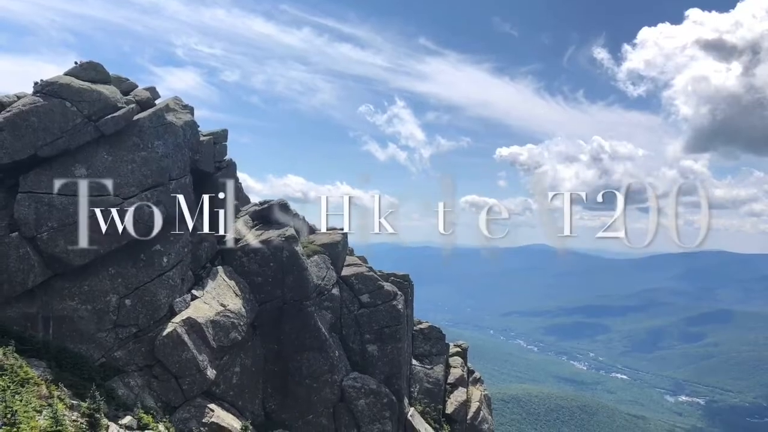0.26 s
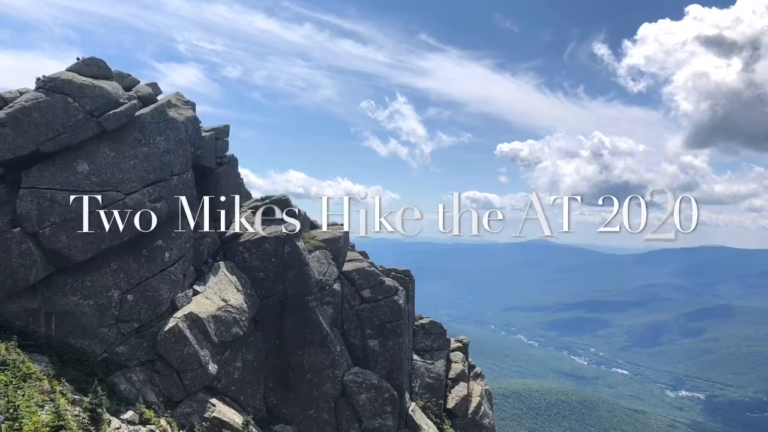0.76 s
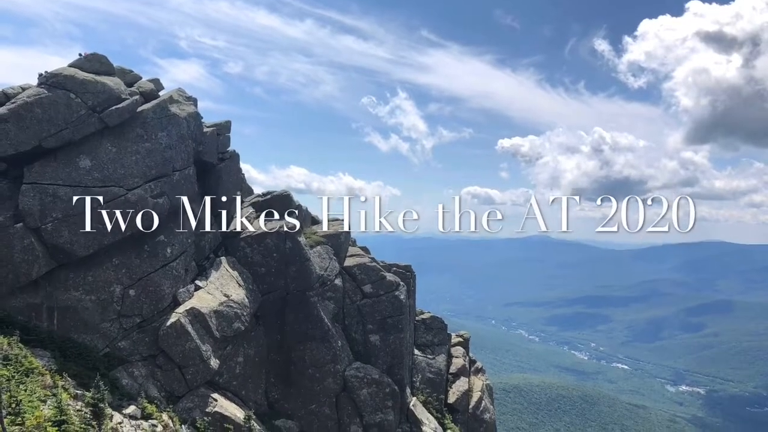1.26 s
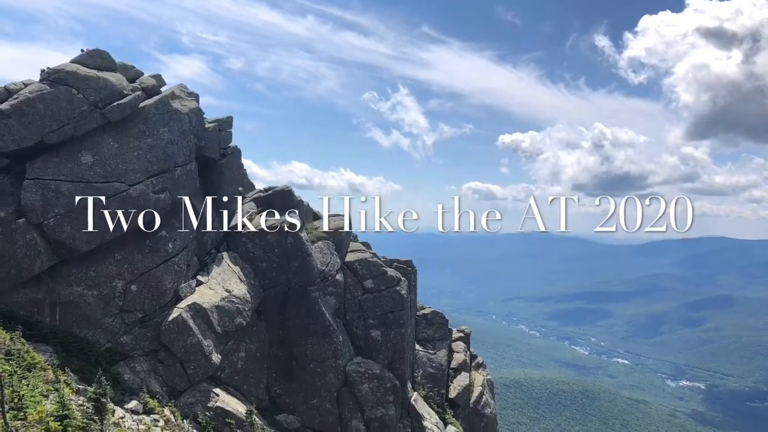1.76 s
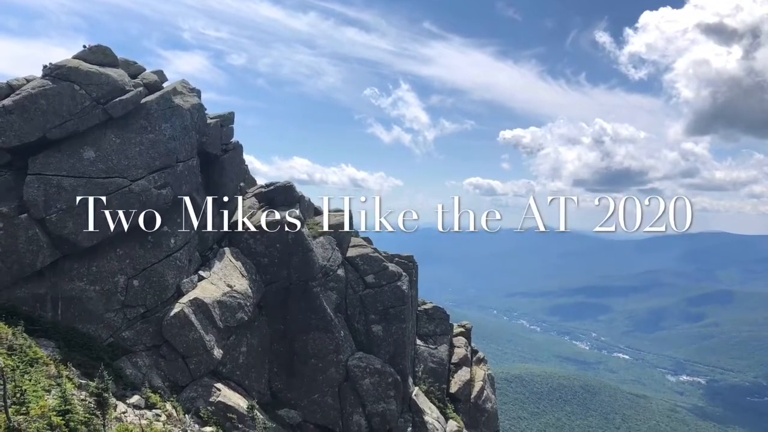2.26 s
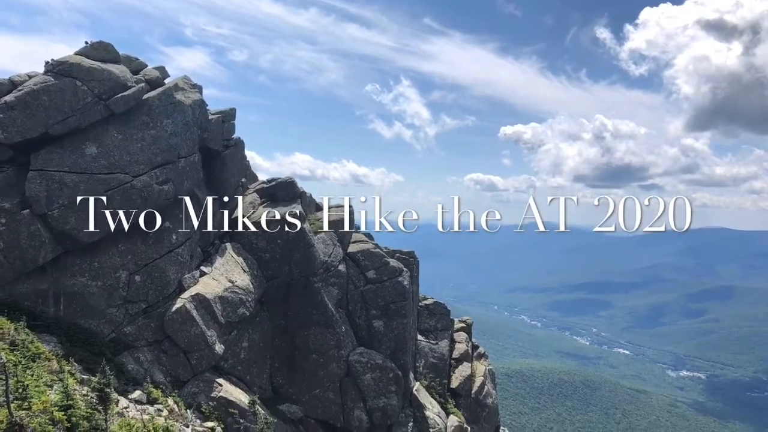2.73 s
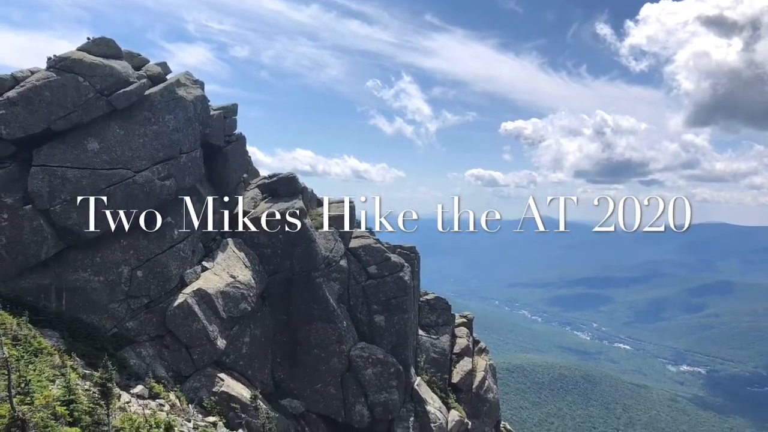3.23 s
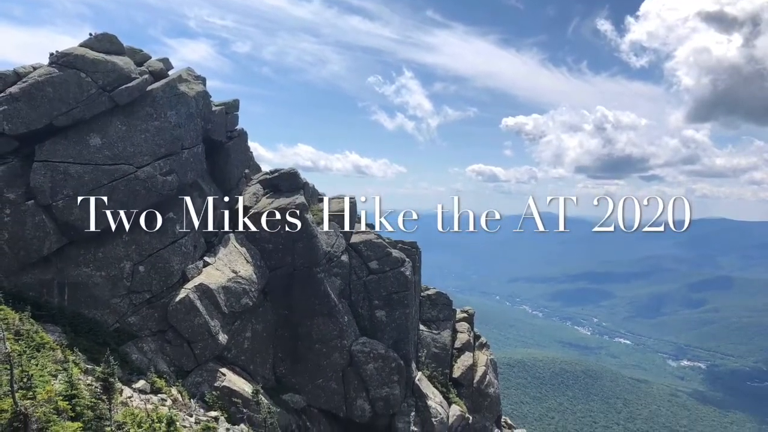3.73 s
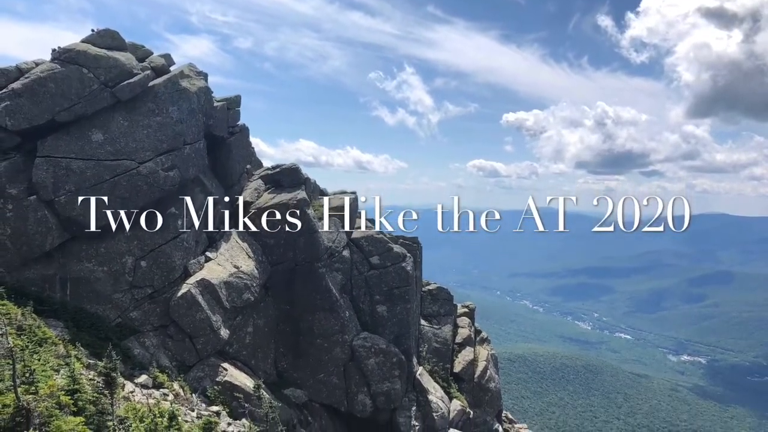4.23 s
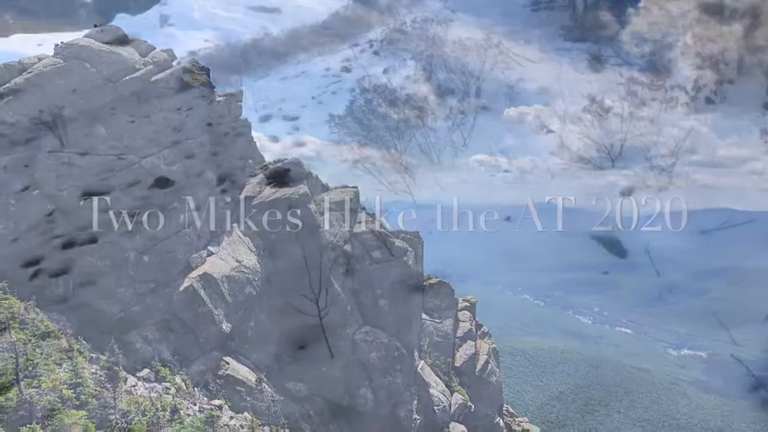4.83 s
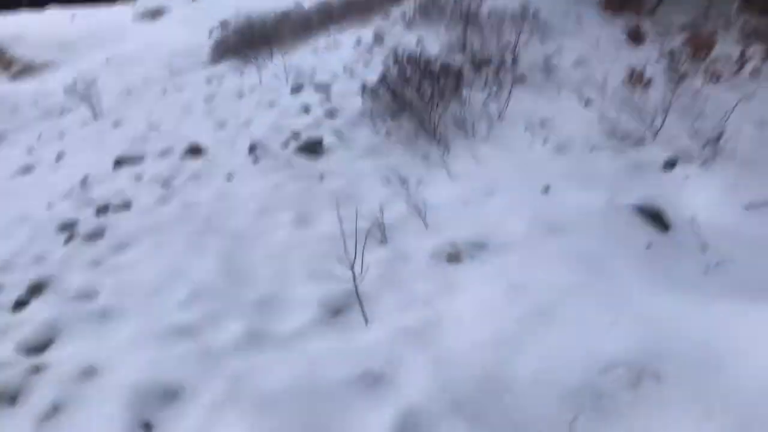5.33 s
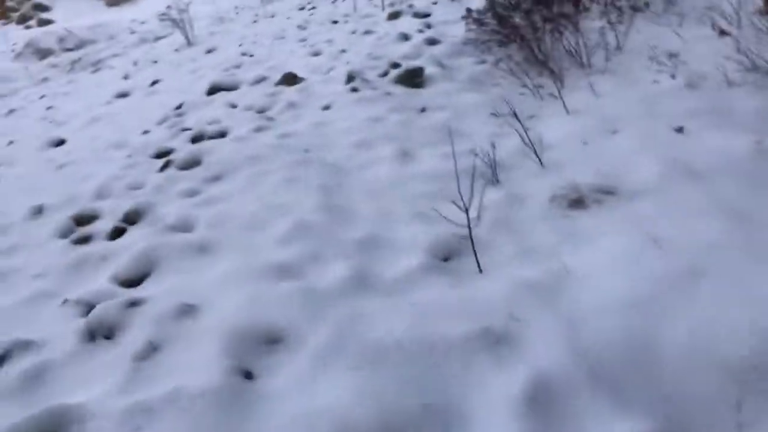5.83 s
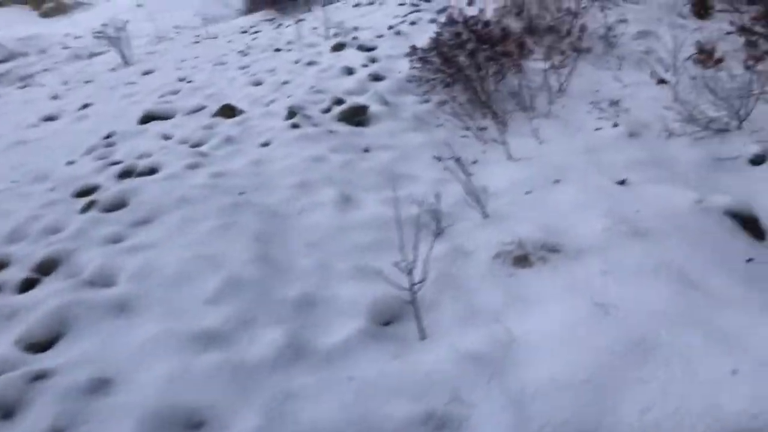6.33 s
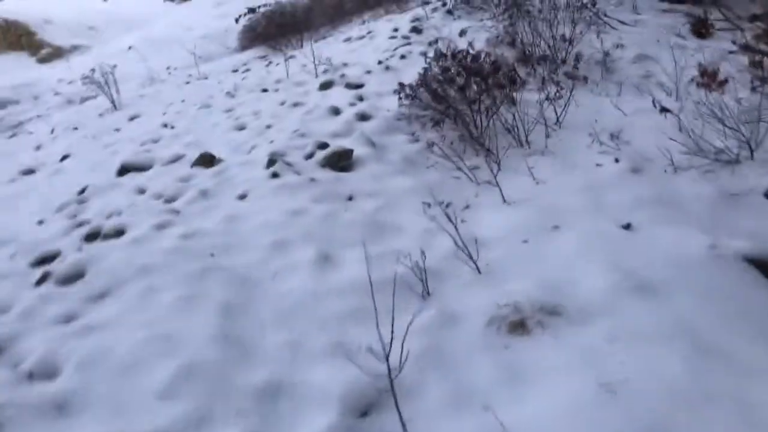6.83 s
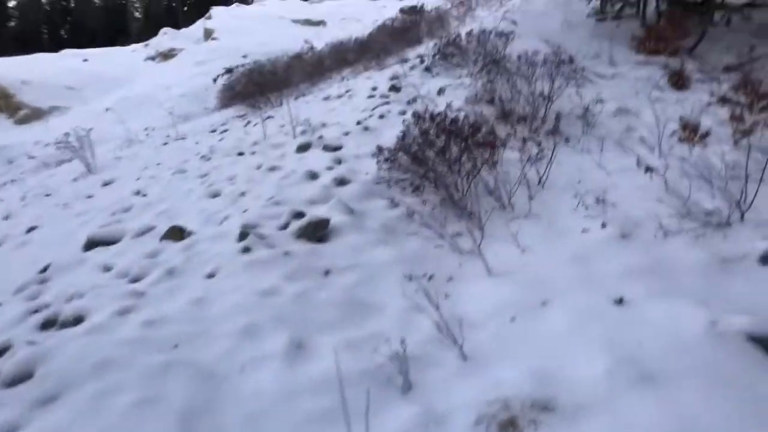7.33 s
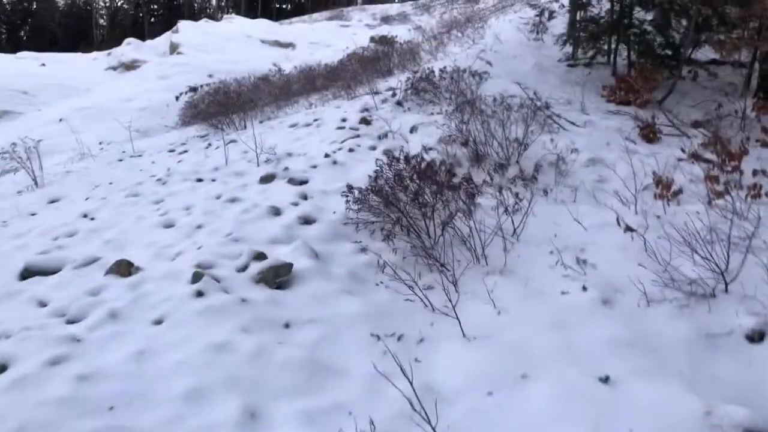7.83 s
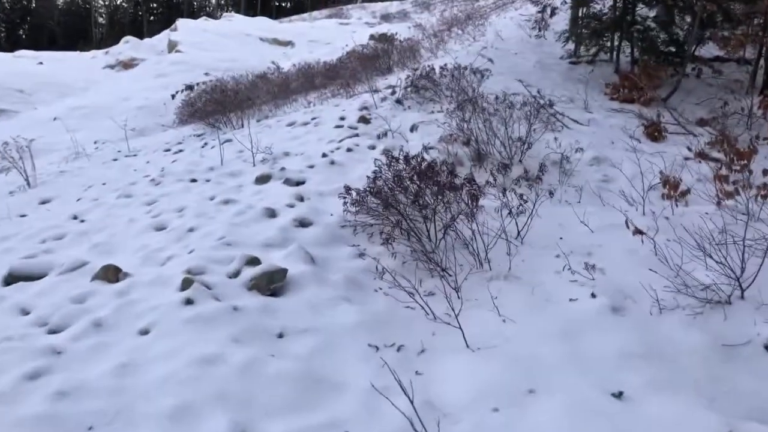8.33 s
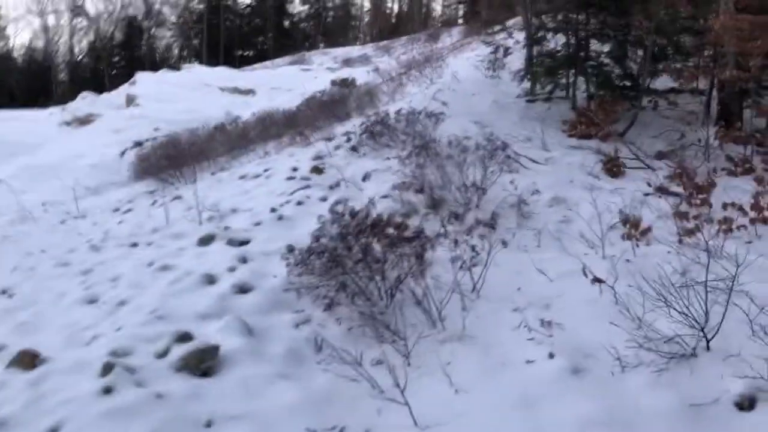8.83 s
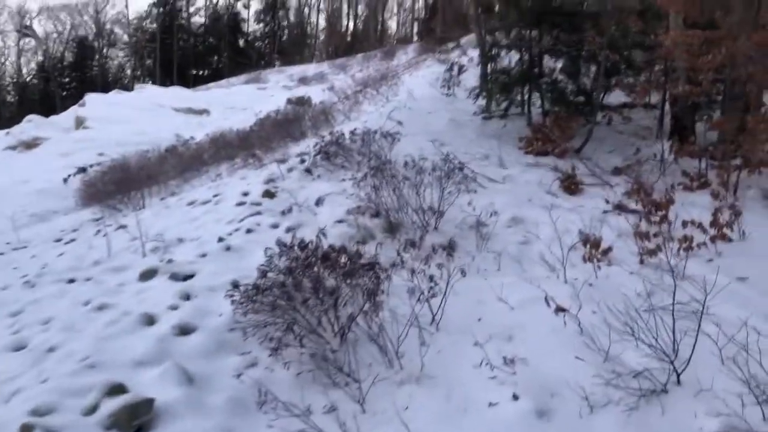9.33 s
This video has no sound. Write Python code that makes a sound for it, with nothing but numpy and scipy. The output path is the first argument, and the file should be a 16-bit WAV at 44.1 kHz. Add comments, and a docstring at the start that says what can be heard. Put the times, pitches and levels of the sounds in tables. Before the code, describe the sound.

Quick footsteps crunch on grit and ice outdoors, a little off to one side, with stones clicking and knocking under the soles. After about eight steps, the sound changes to a slower walk in crusted snow, close and centred. Each boot cracks the hard surface and presses down the snow beneath with a soft thump, and the last step brings a brief hollow note. Faint outdoor air lies behind both walks.

```python
"""Two walks, one after the other. First, quick boots crunch on gritty, icy ground, off to one side of a
pair of microphone openings. Each crush is a swarm of breaking grains, and the packed ground answers with
a later, sinking thud. From about 4 s the air of the first place fades into that of the second, where
slower boots break through crusted snow, close to a single microphone. At the very end, a hollow under
the crust rings."""
import sys
import numpy as np
from scipy import signal
from scipy.fft import rfft, irfft, next_fast_len
from scipy.io import wavfile

SR = 44100
rng = np.random.default_rng(int(sys.argv[2]) if len(sys.argv) > 2 else 0)


def log_audio(samples):
    """Write samples as a 16-bit WAV file to the path given in sys.argv[1]."""
    # one column per channel
    frames = np.atleast_2d(samples).T
    # limit to full scale, then quantise
    limited = np.clip(frames, -1, 1)
    pcm = np.round(limited * 32767).astype(np.int16)
    wavfile.write(sys.argv[1], SR, pcm)


N = 422478

# the bright tone of snapping ice and loose grains: pitch_hz, level_db
ICE_TONE = [(500, -42), (1500, -7), (3000, 4), (5000, -9.5), (9000, -12.5), (16000, -13.5)]


def boots_on_grit():
    """The heel lands, the sole rolls and the grit settles; the sole also grinds, and stones crack."""
    # footfalls: start_s, heel_db, heel_length_s, roll_db, roll_length_s, thud_over_crunch_db
    steps = [(0.134, -32.5, .015, -38.5, 0.17, -10), (0.797, -31.5, 0.0043, -33, 0.091, -7.5),
             (1.37, -41, 0.0078, -38.5, 0.12, -3), (2.014, -33, 0.012, -29.5, 0.038, -4),
             (2.616, -31, 0.0034, -37.5, 0.16, -6.5), (3.244, -34, .008, -40.5, 0.18, -8.5),
             (3.844, -28.5, 0.013, -41, 0.15, -8.5), (4.414, -30, 0.0076, -37.5, 0.089, -5.5)]
    # the sole grinds or scuffs the grit: start_s, length_s, crunch_db, hiss_over_crunch_db
    grinds = [(0.289, 0.053, -44, -7.5), (0.435, 0.19, -55.5, -8), (0.82, 0.067, -33.5, -11.5),
              (1.213, 0.23, -61, -30), (1.502, 0.055, -36.5, -45), (1.784, 0.21, -60, -18),
              (2.011, 0.064, -42, -9.5), (2.362, 0.26, -54, -24), (2.648, 0.057, -29.5, -40),
              (2.71, 0.033, -36.5, -40), (2.76, 0.076, -43, -8), (3.09, 0.27, -62, -30),
              (3.276, 0.051, -31.5, -18), (3.541, 0.062, -49, -11), (4.457, 0.014, -32, -29),
              (4.554, 0.056, -41.5, -20.5)]
    # single stones crack: start_s, crunch_db, hiss_over_crunch_db
    stones = [(0.146, -25, -45), (0.269, -25, -17), (0.479, -40, -4), (0.525, -43, -40),
              (0.824, -25.5, -45), (0.894, -41, -27), (1.102, -35, -40), (1.247, -42.5, -40),
              (1.409, -25, -15), (1.98, -52, -35), (2.031, -20, -7.5), (2.214, -40, -40), (2.375, -31, -42),
              (2.452, -32, -38), (2.541, -41, -42), (2.649, -27, -41), (2.666, -19.5, -40),
              (2.674, -20, -28), (2.707, -20, -36), (2.718, -27, -32), (2.804, -42, -30),
              (3.103, -45.5, -30), (3.155, -43, -40), (3.336, -29, -27), (3.38, -31.5, -44),
              (3.46, -39.5, -24), (3.759, -45.5, -26), (3.935, -36.5, -8), (4.218, -45.5, -40),
              (4.362, -43.5, -35), (4.394, -40.5, -35)]
    # the tone of the grit's crunch, hiss and thud: pitch_hz, level_db
    crunch_tone = [(150, -36.5), (300, -5.5), (600, -2.5), (800, -4), (1150, -12), (1700, -12.5),
                   (3500, -30), (9000, -42)]
    hiss_tone = [(1800, -62), (3500, 4.5), (8000, 12), (16000, -8)]
    thud_tone = [(40, -6), (90, -11), (200, 5.5), (300, 2), (500, -34)]
    stone_s, settle_s = 0.00491, 0.26
    stone_thud_db, grind_thud_db, step_hiss_db = -30.5, -18.5, -40  # compared with the crunch
    crushes = [(at, stone_s, db, hiss_db, stone_thud_db) for at, db, hiss_db in stones]
    crushes += [(*grind, grind_thud_db) for grind in grinds]
    for at, heel_db, heel_s, roll_db, roll_s, thud_db in steps:
        heel = (at, heel_s, heel_db)
        roll = (at, roll_s, roll_db)
        settle = (at + roll_s, settle_s, roll_db - 20)
        crushes += [(*part, step_hiss_db, thud_db) for part in (heel, roll, settle)]
    return crush_ground(crushes, (crunch_tone, hiss_tone, thud_tone), rise_s=0.001, thud_extra_s=0.011,
                        sink_cycles=0.472, grains_per_s=500, spread_db=2.5, click_share=0.61)


def boots_in_snow():
    """The boots crack the hard crust and press down the snow below it."""
    # the snow is pressed down: start_s, length_s, crunch_db, hiss_over_crunch_db
    presses = [(4.841, 0.13, -50.5, -5.5), (4.933, 0.084, -45, -9), (5.058, 0.066, -41.5, -16),
               (5.141, 0.048, -43.5, -15), (5.38, 0.12, -41.5, -23), (5.576, 0.11, -48.5, -39),
               (5.639, 0.11, -30.5, -14), (5.813, 0.093, -43, -4), (5.877, 0.063, -44.5, -1.5),
               (6.137, 1, -53, -12.5), (6.441, 0.03, -36, -2.5), (6.496, 0.18, -31.5, -7.5),
               (6.749, 0.14, -44, -6.5), (6.915, 0.21, -57.5, -3), (6.995, 0.054, -43.5, -21),
               (7.238, 0.21, -61.5, -13), (7.377, 0.047, -30.5, -7), (7.384, 0.21, -39.5, -12),
               (7.554, 0.052, -29, -11), (7.625, 0.14, -49, -8.5), (7.979, 0.032, -53.5, -13),
               (8.324, 0.037, -35, -7.5), (8.4, 0.091, -34.5, -7), (8.496, 0.081, -37.5, -31),
               (8.568, 0.19, -37.5, -11), (8.798, 0.11, -49.5, -18), (9.172, 0.17, -59.5, -4.5),
               (9.337, 0.18, -29.5, -12.5), (9.485, 0.023, -34, -4)]
    # the crust cracks: start_s, length_s, crunch_db, thud_over_crunch_db
    cracks = [(4.79, 0.0028, -35.5, -1), (4.825, 0.0078, -37.5, -0.5), (5.187, 0.0055, -42, -1),
              (5.383, 0.021, -25, -4.5), (5.454, 0.0035, -31.5, -12), (5.497, 0.0069, -25.5, -13.5),
              (5.656, 0.023, -21.5, 2.5), (5.67, 0.013, -23, -14), (5.771, 0.0037, -29, -1),
              (5.781, 0.0078, -28, 0), (5.831, 0.011, -35, -12), (6.093, 0.0081, -40, -5),
              (6.147, 0.01, -32.5, -2.5), (6.185, 0.0074, -39.5, -6), (6.226, 0.017, -32.5, -3.5),
              (6.294, 0.014, -32, -5), (6.34, .006, -41, -2), (6.356, 0.017, -33, -1),
              (6.392, .014, -31.5, -3.5), (6.448, 0.0087, -31.5, -5), (6.586, 0.018, -16.5, -11.5),
              (6.653, 0.011, -28, -5), (6.694, 0.0047, -33, 1), (6.724, 0.0052, -34.5, -0.5),
              (6.763, 0.015, -40, 4.5), (7.102, 0.0059, -45.5, -20), (7.262, 0.012, -34.5, -1.5),
              (7.335, 0.018, -40, 1), (7.398, 0.027, -23.5, -4), (7.415, 0.0035, -21.5, 0.5),
              (7.509, 0.0033, -28, 0), (7.56, 0.011, -21, -0.5), (7.74, 0.0047, -42.5, 3),
              (7.786, 0.0075, -38, -0.5), (8.161, 0.015, -51, -5), (8.222, 0.012, -43.5, -1),
              (8.256, 0.01, -35, -2), (8.305, 0.0099, -46, -1), (8.385, 0.0052, -26, -4),
              (8.642, 0.013, -24, -10), (8.664, 0.011, -19, 1), (8.803, 0.0058, -33, -23),
              (9.237, 0.0086, -41, 0.5), (9.297, 0.0064, -35, -3), (9.335, 0.0029, -38, -3),
              (9.44, 0.022, -21, -23), (9.509, 0.0036, -22.5, -7)]
    # the tone of the snow's crunch, hiss and thud: pitch_hz, level_db
    crunch_tone = [(250, -20.5), (450, -2.5), (1000, -4), (1400, -5), (2300, -5.5), (2800, -10),
                   (4500, -16.5), (10000, -53)]
    hiss_tone = [(3000, -5), (5000, -2), (8000, -2.5), (16000, -20)]
    thud_tone = [(25, -26), (60, -4.5), (160, 1.5), (330, 1), (450, -3), (700, -28)]
    press_thud_db, crack_hiss_db = -2, -11.5  # compared with the crunch
    crushes = [(*press, press_thud_db) for press in presses]
    crushes += [(at, length_s, db, crack_hiss_db, thud_db) for at, length_s, db, thud_db in cracks]
    return crush_ground(crushes, (crunch_tone, hiss_tone, thud_tone), rise_s=0.0024, thud_extra_s=0.0053,
                        sink_cycles=1.381, grains_per_s=1500, spread_db=4.0, click_share=0.054)


def crush_ground(crushes, tones, rise_s, thud_extra_s, sink_cycles, grains_per_s, spread_db, click_share):
    """Under a boot, grains crunch, finer ones hiss and the ground thuds; overlapping powers add up."""
    power = np.zeros((4, N + SR))
    swarm_power, burst_power, hiss_power, thud_power = power
    clicks = np.zeros(N + SR)
    t = np.arange(SR // 2) / SR
    for at, length_s, db, hiss_db, thud_db in crushes:
        span = slice(round(at * SR), round(at * SR) + len(t))
        shape = swell(t, length_s, rise_s)
        if length_s < 0.0075:  # so short a crush is one break: a burst of noise and a clean click
            burst_power[span] += amp(db) ** 2 * shape * (1 - click_share)
            clicks[span.start + shape.argmax()] += amp(db) * np.sqrt(click_share * shape.sum())
        else:
            swarm_power[span] += amp(db) ** 2 * shape
        hiss_power[span] += amp(db + hiss_db) ** 2 * shape
        thud_power[span] += amp(db + thud_db) ** 2 * swell(t, length_s + thud_extra_s, rise_s=0.0015)
    grains = crackle(grains_per_s, spread_db, life_s=0.0012)
    fine_grains = crackle(0.38 * grains_per_s, spread_db, life_s=0.0009)
    fizz = unit(grains + 1.32 * fine_grains)
    lumps = crackle(per_s=230, spread_db=1.0, life_s=0.0031)
    swarm, burst, hiss, thud = np.sqrt(power[:, :N]) * [grains, rng.standard_normal(N), fizz, lumps]
    crunch = swarm + burst + clicks[:N]
    # the ground carries low notes more slowly, so the thud sinks in pitch
    thud = filtered(thud, lambda hz: np.exp(-2j * np.pi * sink_cycles * np.log(1 + hz / 30)))
    return sum(coloured(layer, tone) for layer, tone in zip((crunch, hiss, thud), tones))


def sole_knocks():
    """Round knocks under the sole; the higher ones are short and squeaky."""
    # knocks on the grit: start_s, level_db, pitch_hz
    knocks = [(0.135, -24, 500), (0.147, -19.5, 610), (0.27, -19, 700), (0.479, -30, 1710),
              (0.525, -33, 1520), (0.627, -41, 1780), (0.797, -24.5, 497), (1.409, -24, 654),
              (1.47, -37, 210), (2.032, -16.5, 478), (2.647, -21, 615), (2.666, -12.5, 618),
              (2.708, -8.5, 637), (2.718, -20, 600), (2.804, -32, 680), (3.245, -27, 523), (3.38, -26, 566),
              (3.848, -18, 546), (4.415, -22.5, 550), (4.46, -29, 610)]
    ring_cycles = 21.6
    return sum(ring(at, db, hz, ring_cycles / hz, rise_s=0.00077) for at, db, hz in knocks)


def body_weight():
    """The walker's full weight lands in the snow with a deep, soft push."""
    # landings: start_s, level_db
    landings = [(5.679, -30), (6.599, -26), (7.425, -25.5), (7.575, -38), (8.686, -22)]
    return sum(ring(at, db, pitch_hz=68, fade_s=0.14, rise_s=0.0047) for at, db in landings)


def hollow_under_crust():
    """A hollow under the snow crust gives one short, low ring."""
    return ring(start_s=9.451, level_db=-8, pitch_hz=280, fade_s=0.075, rise_s=0.0016)


def ice_chips():
    """Each ice chip snaps with a tiny burst of noise."""
    # single chips: start_s, level_db
    snaps = [(0.1406, -52), (0.2698, -43), (0.281, -31), (0.4724, -32.5), (0.4983, -31.5), (0.65, -41),
             (0.817, -29), (0.895, -24.5), (1.072, -36), (1.235, -37), (1.4072, -31), (2.032, -51),
             (2.238, -39), (2.3768, -29), (2.45, -36), (2.543, -34.5), (2.776, -28.5), (2.904, -39),
             (3.759, -42.5), (3.8473, -51), (3.9268, -36), (4.0497, -44), (4.416, -25)]
    bursts = np.zeros(N + SR)
    t = np.arange(SR // 100) / SR
    for at, db in snaps:
        bursts[round(at * SR):][:len(t)] += amp(db - 60 * t / 0.011) * rng.standard_normal(len(t))
    return amp(-6.5) * coloured(bursts[:N], ICE_TONE)


def loose_grains():
    """Loose grains trickle with faint ticks."""
    return amp(-73.5) * coloured(crackle(per_s=22, spread_db=5.5, life_s=0.00067), ICE_TONE)


def outdoor_air(tone, level_db):
    """Quiet outdoor air with faint rustles in it."""
    return amp(level_db) * coloured(crackle(per_s=260, spread_db=-2.0, life_s=0.008), tone)


def crackle(per_s, spread_db, life_s):
    """Noise made of many tiny bursts of unequal size, at an average power of 1."""
    when, chance = rng.random((int(N / SR * per_s), 2)).T
    sizes = amp(-spread_db * np.log(chance + 0.0085))
    power = np.bincount((when * N).astype(int), sizes ** 2, N)
    for smooth_s in (life_s, 0.5 * life_s):  # smoothing twice gives a short rise, then a fall
        power = signal.lfilter([1], [1, -np.exp(-1 / (smooth_s * SR))], power)
    return unit(np.sqrt(np.abs(power)) * rng.standard_normal(N))


def swell(t, length_s, rise_s):
    """The power of a crush: it rises fast to 1, holds and stops rather suddenly."""
    shape = ((1 - np.exp(-t / rise_s)) * np.exp(-(t / length_s) ** 2)) ** 2
    return shape / shape.max()


def ring(start_s, level_db, pitch_hz, fade_s, rise_s):
    """One pure note that dies away by 60 dB in fade_s."""
    note = np.zeros(N + SR)
    t = np.arange(SR // 2) / SR
    loudness = amp(level_db - 60 * t / fade_s) * (1 - np.exp(-t / rise_s))
    note[round(start_s * SR):][:len(t)] = loudness * np.sin(2 * np.pi * pitch_hz * t)
    return note[:N]


def microphone_pair(x, lag_s):
    """The sound reaches the left opening a little after the right one."""
    return filtered(x, lambda hz: np.exp(-1j * np.pi * hz * lag_s * np.array([[1], [-1]])))


def coloured(x, tone):
    """Give x a tone of (pitch_hz, level_db) points; white noise keeps its power."""
    hz, db = np.transpose(tone)
    size = 4096
    gain = amp(np.interp(np.log(np.fft.rfftfreq(size, 1 / SR) + 1), np.log(hz), db, left=-60))
    # fold the filter forward in time, so that nothing sounds before its cause
    cepstrum = irfft(np.log(gain), size)
    cepstrum[1:size // 2] *= 2
    cepstrum[size // 2 + 1:] = 0
    pulse = irfft(np.exp(rfft(cepstrum)), size)
    return signal.fftconvolve(x, pulse / np.linalg.norm(pulse))[:N]


def filtered(x, response):
    """Scale and delay each frequency of x as response(hz) says."""
    size = next_fast_len(N + 8192)
    return irfft(rfft(x, size) * response(np.fft.rfftfreq(size, 1 / SR)), size)[..., :N]


def amp(db):
    """Turn decibels into a number to multiply by."""
    return 10 ** (np.asarray(db) / 20)


def unit(x):
    """Scale x to an average power of 1."""
    return x / np.sqrt(np.mean(x ** 2) + 1e-20)


def scene():
    """The walk on grit, then the walk in snow; the air of one place fades into the other's."""
    # the tone of the air in each place: pitch_hz, level_db
    grit_air_tone = [(20, 7), (55, 7.5), (130, -12.5), (300, -4.5), (600, -5.5), (4000, -21.5), (6500, -24),
                     (15000, -25.5)]
    snow_air_tone = [(20, -28), (70, 0.5), (370, -1), (750, -6), (2200, -10.5), (3500, -13), (12000, -27.5)]
    fade_from_s, fade_to_s = 4.1, 5.3
    fade = np.clip((np.arange(N) / SR - fade_from_s) / (fade_to_s - fade_from_s), 0, 1)
    grit = ice_chips() + sole_knocks() + boots_on_grit()
    direct = microphone_pair(grit, lag_s=7.6e-5) * amp([[0.2], [-0.2]])
    late_grit = np.pad(grit, (SR // 500, 0))[:N]  # 2 ms later
    echo = amp(-16.5) * microphone_pair(late_grit, lag_s=0.00032)  # from further to the side
    snow = boots_in_snow() + hollow_under_crust() + body_weight()
    grit_air = microphone_pair(loose_grains() + outdoor_air(grit_air_tone, -62.5), lag_s=7.5e-5)
    grit_air += [outdoor_air(grit_air_tone, -71.0), outdoor_air(grit_air_tone, -64.0)]  # left, right
    snow_air = outdoor_air(snow_air_tone, -60.5)
    return direct + echo + snow + (1 - fade) * grit_air + np.sqrt(fade) * snow_air


def record(dry):
    """Cut away everything above 16000 Hz."""
    return filtered(dry, lambda hz: hz < 16000)


dry = scene()
out = record(dry)
log_audio(out)
```